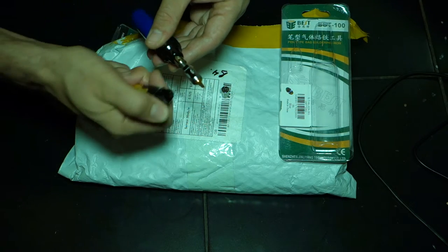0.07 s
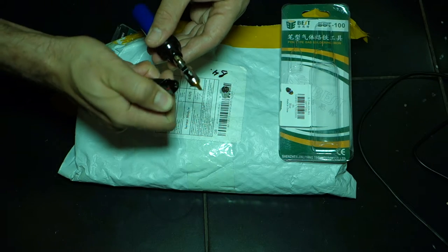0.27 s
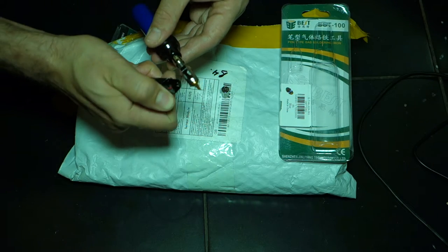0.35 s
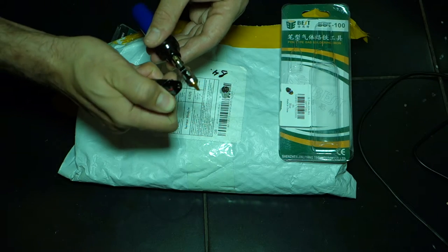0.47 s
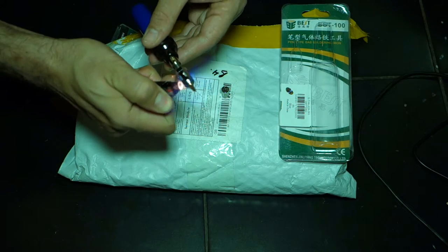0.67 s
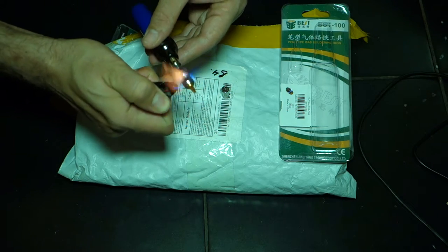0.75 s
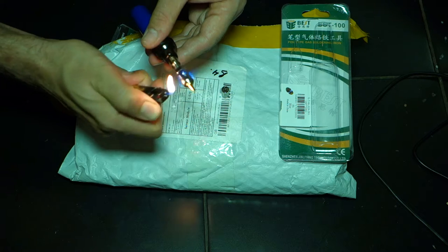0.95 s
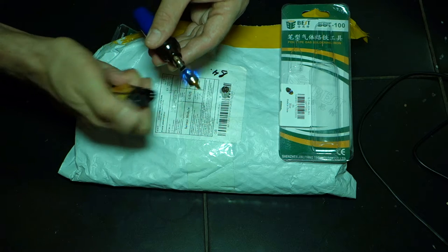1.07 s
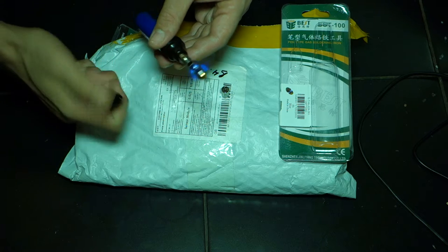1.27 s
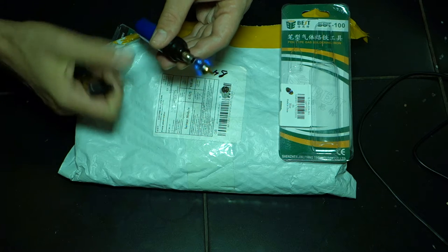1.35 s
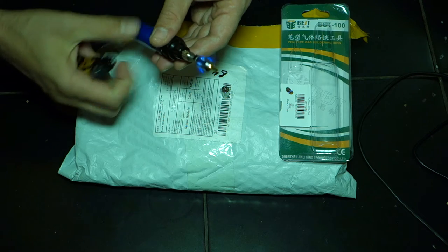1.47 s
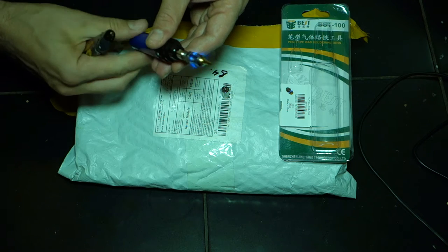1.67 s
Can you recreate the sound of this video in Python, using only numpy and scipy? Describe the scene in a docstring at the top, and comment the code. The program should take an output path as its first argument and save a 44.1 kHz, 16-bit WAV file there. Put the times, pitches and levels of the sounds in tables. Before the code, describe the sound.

A flint lighter clicks sharply several times close by, then rasps, and a softly hissing gas soldering pen catches with a low puff. The lever snaps back and the hiss softens, over a faint fan hum in a small room.

```python
"""First comes the hiss of gas from a soldering pen in a small room, with a fan motor humming behind it.
A flint lighter clicks under the thumb as its small parts hit and ring, and its case knocks once.
Its wheel rasps over the flint and the gas catches with a soft, low puff. The lever snaps back,
and the pen burns on with a quieter hiss and a faint whistle."""
import sys
import numpy as np
from scipy import signal
from scipy.fft import rfft, irfft, next_fast_len
from scipy.io import wavfile
from scipy.ndimage import uniform_filter1d, map_coordinates

SR = 44100
rng = np.random.default_rng(int(sys.argv[2]) if len(sys.argv) > 2 else 0)


def output_pcm(signal):
    """Save a mono or channel-first signal as 16-bit PCM at the path in sys.argv[1].

    Samples are clipped to [-1, 1] before scaling.
    """
    pcm = np.clip(np.atleast_2d(signal).T, -1, 1) * 32767
    wavfile.write(sys.argv[1], SR, np.round(pcm).astype(np.int16))


N = 74970


def amp(db):
    """Turn decibels into a number to multiply by."""
    return 10 ** (np.asarray(db) / 20)


def unit(x):
    """Scale a signal to an average (rms) strength of 1."""
    return x / np.sqrt(np.mean(x ** 2) + 1e-20)


def along(points, hz):
    """Read between (frequency, value) points on a log frequency scale."""
    f, v = np.transpose(points)
    return np.interp(np.log(hz + 1), np.log(f + 1), v)


def wobble(per_s):
    """A smooth curve through per_s random values a second."""
    return map_coordinates(rng.standard_normal(int(N * per_s / SR) + 4), [np.arange(N) * per_s / SR])


def coloured(x, db_at):
    """Turn each frequency up or down by db_at(hz) decibels."""
    n = x.shape[-1]
    m = 2 * next_fast_len(n)
    cepstrum = irfft(np.log(amp(db_at(np.fft.rfftfreq(m, 1 / SR)))), m)
    # make the ringing come after a sound, never before it
    cepstrum[1:m // 2] *= 2
    cepstrum[m // 2 + 1:] = 0
    return irfft(rfft(x, m) * np.exp(rfft(cepstrum)), m)[..., :n]


def stereo(pair, alike, pan_db=0):
    """Mix two unrelated signals into left and right; alike=1 gives both the same wave."""
    turn = np.arccos(np.clip(alike, -1, 1)) / 2
    mid, side = pair[0] * np.cos(turn), pair[1] * np.sin(turn)
    return np.array([(mid + side) * amp(pan_db / 2), (mid - side) * amp(-pan_db / 2)])


def noise(colour):
    """Two unrelated noises whose colour (mix of lows and highs) follows a table."""
    return unit(coloured(rng.standard_normal((2, N)), lambda hz: along(colour, hz)))


# colour of the hiss, unlit and burning: f/Hz, level/dB
UNLIT_HISS = [(500, -41), (1800, -14), (2200, -10.5), (3300, -16), (4700, -15), (6000, -3.5), (7300, -16.5),
              (8300, -6), (9400, 0.5), (10100, 1.5), (11000, -10.5)]
BURNING_HISS = [(500, -13), (1800, -13.5), (2200, -3.5), (3400, -14.5), (4000, -5.5), (4600, -17),
                (5500, -6.5), (6200, -5), (6900, -15), (8300, -14.5), (9400, 3), (10100, -2.5),
                (11000, -15)]

def gas_jet(lit_s=0.76, change_s=0.1, whistle_hz=5960, whistle_width_hz=150):
    """Gas hisses through the nozzle; once lit it softens and a faint whistle grows."""
    t = np.arange(N) / SR - lit_s
    lit = np.clip(t / change_s, 0, 1)
    cold = amp(-48) * np.sqrt(1 - lit) * noise(UNLIT_HISS)
    peak_db = lambda hz: -20 * np.log10(1 + (2 * (hz - whistle_hz) / whistle_width_hz) ** 2)
    whistle = amp(-77 + 18.5 * t) * unit(coloured(rng.standard_normal((2, N)), peak_db))
    flame = amp(-52 - 3.5 * t) * noise(BURNING_HISS)
    hiss = cold + np.sqrt(lit) * (flame + whistle)
    flutter = amp(0.8 * wobble(per_s=14.6))
    return stereo(hiss, alike=0.1, pan_db=-1.5) * flutter


# the motor's tones: cycles per turn of the shaft, level/dB
MOTOR_TONES = [(2, -48), (3, -68), (6, -79.5), (9, -70), (26, -65), (29, -70), (31, -76)]
# colour of the moving air: f/Hz, level/dB
AIR_RUSH = [(20, -16), (60, -4.5), (130, 2), (200, -2.5), (330, -8.5), (450, -10), (700, -13), (900, -18.5),
            (1150, -11.5), (1370, -6), (1650, -20), (3000, -25), (11000, -20.5)]
# how alike the air sounds left and right: f/Hz, likeness from 0 to 1
AIR_LIKENESS = [(30, 0.85), (120, 0.99), (300, 0.7), (600, 0.38), (1400, 0.16), (5000, 0.12)]

def fan(shaft_hz=49.32, air_db=-56.5):
    """The motor hums at multiples of its turning speed, over a soft rush of air."""
    shaft_angle = 2 * np.pi * shaft_hz * np.arange(N) / SR + 0.025 * wobble(per_s=5.06)
    hum = np.zeros(N)
    for cycles, db in MOTOR_TONES:
        strength = np.sqrt(2) * amp(db - 0.5 * wobble(per_s=5.1))
        hum += strength * np.sin(cycles * shaft_angle + 2 * np.pi * rng.random())
    alike = along(AIR_LIKENESS, np.fft.rfftfreq(N, 1 / SR))
    air = irfft(stereo(rfft(noise(AIR_RUSH)), alike), N)
    return hum + amp(air_db) * air


def rattle(t, fade_s, crack_fade_s=0.0014, smooth_hz=500):
    """One hit: a sharp crack and a dying chatter. A fade is the time taken to drop 60 dB."""
    chatter = amp(-60 * t / fade_s)
    crack = amp(-6 - 60 * t / crack_fade_s)
    burst = rng.standard_normal((2, len(t))) * (chatter + crack)
    # even out lows and highs so that every part is shaken alike
    power = np.abs(rfft(burst)) ** 2
    power = np.abs(uniform_filter1d(power, round(smooth_hz * len(t) / SR), axis=1))
    excess_db = 10 * np.log10(power / power.mean(axis=1, keepdims=True) + 1e-9)
    grid = np.fft.rfftfreq(len(t), 1 / SR)
    return np.array([coloured(b, lambda hz: -np.interp(hz, grid, e)) for b, e in zip(burst, excess_db)])


# notes of the lighter's shell: f/Hz, width/Hz, boost/dB
SHELL_NOTES = [(2075, 38, 8), (3330, 23, 9.5), (5040, 36, 7.5), (6030, 64, 4), (10000, 23, 4)]

def shell_db(hz):
    """The shell rings at a few sharp pitches and makes them louder."""
    return sum(db / (1 + (2 * (hz - centre) / width) ** 2) for centre, width, db in SHELL_NOTES)


# bounces off the hands and table: delay/s, level/dB
BOUNCES = [(.0013, -21), (.0031, -10.5), (.0042, -18.5)]

def near_echoes(x):
    """The sound plus its weak copies from nearby surfaces."""
    n = x.shape[-1]
    hz = np.fft.rfftfreq(2 * n, 1 / SR)
    echoes = sum(amp(db) * np.exp(-2j * np.pi * hz * delay_s) for delay_s, db in BOUNCES)
    return irfft(rfft(x, 2 * n) * (1 + echoes))[..., :n]


# how long the room rings: f/Hz, fade/s
ROOM_FADE = [(200, 0.32), (2000, 0.22), (6000, 0.25), (11000, 0.19)]
# colour of the room's echo: f/Hz, level/dB
ROOM_TONE = [(1500, 6.5), (4000, 0.5), (7500, 2.5), (9300, 0.5), (10300, 2.5)]

def room(x, delay_s=0.002, build_s=0.0085):
    """Echoes from the walls blur into a short tail, different on each side."""
    hz, t, spectrum = signal.stft(rng.standard_normal((2, SR // 2)), SR, nperseg=256)
    fade = amp(-60 * t / along(ROOM_FADE, hz)[:, None])
    tail = signal.istft(spectrum * fade, SR, nperseg=256)[1]
    tail *= np.clip((np.arange(tail.shape[1]) / SR - delay_s) / build_s, 0, 1)
    tail /= np.linalg.norm(tail, axis=1, keepdims=True)
    tail = coloured(tail, lambda hz: along(ROOM_TONE, hz))
    return signal.fftconvolve(x, tail, axes=1)[:, :x.shape[1]]


# where the lighter's body, cap, lever, spring, wheel and metal edge ring: f/Hz, width/Hz
PARTS = [(2030, 270), (2980, 220), (3930, 250), (5050, 300), (6250, 430), (10500, 800)]
# colour shared by all clicks: f/Hz, level/dB
CLICK_TONE = [(100, -39), (500, -32.5), (850, -34), (1300, -17.5), (1800, -10), (2700, -4), (4000, -2.5),
              (6000, -6), (7500, -2), (9500, 3), (11000, -1.5)]
# the clicks: t/s, level/dB, fade/s, boost/dB for each of the six parts, left over right/dB, room/dB
LIGHTER_HITS = [(0.1185, -23, 0.015, 3, -6, -7, 2.5, 8, -2, -1.5, -6),
                (0.1346, -31, 0.0088, -12, -15, 6, -2, 0, 14, -5, -7.5),
                (0.1578, -33.5, 0.061, 5.5, -1.5, -3, 3, 8.5, 6.5, -4.5, -8),
                (0.2279, -21, 0.012, -3, -9, 8, 5, 5.5, 16.5, -5, -7.5),
                (0.3652, -16, 0.034, 11, -8, 3, -4, 5.5, 0.5, -3.5, -6.5),
                (0.5734, -21, 0.017, 4.5, -8, 5.5, 3, 10.5, 6.5, -4, -7),
                (0.6538, -13, 0.015, -0.5, -4.5, 1, 6, 6.5, 3.5, -5, -6),
                (0.6926, -25, 0.014, -6, 2, -1, -6, 9, 3.5, -21, -6),
                (0.6932, -14, 0.021, 12.5, -4, 9.5, 10, 9.5, -1.5, -6, 1),
                (0.969, -27, 0.031, 13.5, -0.5, -3, 4.5, 0.5, -5.5, -0.5, -3.5),
                (.9772, -29, 0.023, 5, -2, 5, -4, 6, -5, -2, -6),
                (1.0702, -17.5, 0.015, 14, 4, 7, -3, -5, 4, -3, -3.5),
                (1.0820, -18.5, 0.036, 10, 12, 15.5, -2, 2.5, -6, -3, -6),
                (1.4903, -46, 0.037, -2, 20, 3, 11, 6, -10, -1, -9)]

def lighter_clicks(full_lean_hz=3520):
    """Each hit rattles the lighter and rings its parts, some more than others."""
    out = np.zeros((2, N + SR))
    t = np.arange(SR // 2) / SR
    for start_s, db, fade_s, *boosts_db, pan_db, room_db in LIGHTER_HITS:
        parts_db = lambda hz: sum(boost * np.exp(-.5 * ((hz - centre) / width) ** 2)
                                  for boost, (centre, width) in zip(boosts_db, PARTS))
        ring = coloured(rattle(t, fade_s), lambda hz: along(CLICK_TONE, hz) + parts_db(hz) + shell_db(hz))
        left, right = stereo(near_echoes(ring), alike=0.29)
        # highs lean to one side, lows stay in the middle
        lean_db = lambda hz: pan_db / 2 * np.minimum(hz / full_lean_hz, 1) ** 2
        direct = np.array([coloured(left, lean_db), coloured(right, lambda hz: -lean_db(hz))])
        echo = amp(room_db) * stereo(room(ring), alike=0.25, pan_db=-1)
        start = round(start_s * SR)
        out[:, start:start + len(t)] += amp(db) * (direct + echo)
    return out[:, :N]


def case_knock(start_s=0.366, pitch_hz=558, fade_s=0.02):
    """The plastic case gives one short, dull note."""
    t = np.maximum(np.arange(N) / SR - start_s, 0)
    note = amp(-43.5 - 60 * t / fade_s) * np.sin(2 * np.pi * pitch_hz * t)
    return note + amp(-12) * room(note[None])


# colour of the scraped flint: f/Hz, level/dB
FLINT_TONE = [(100, -25), (500, -25), (850, -55), (1400, -27), (1950, -3), (2750, -8), (3450, 2),
              (4450, -5), (5150, 1.5), (6400, 0), (7500, -4), (8500, 0), (9200, 3), (10200, 2.5),
              (11000, -0.5)]

def flint_rasp(start_s=0.6932, rise_s=0.0074, peak_s=0.034, fade_s=0.16, grains_per_s=9900):
    """The wheel's teeth tear tiny grains off the flint, harder as it speeds up, then it runs out."""
    t = np.arange(N) / SR - start_s
    effort_db = np.minimum(45 * (t - peak_s), -60 * (t - peak_s) / fade_s)
    bite_db = 1.7 * wobble(per_s=260)  # the teeth bite unevenly
    stroke = np.clip(t / rise_s, 0, 1) * amp(effort_db + bite_db)
    breaks_off = rng.random(N) < grains_per_s / SR
    sizes = breaks_off * amp(1.5 * rng.standard_normal(N))
    grains = sizes * rng.standard_normal((2, N))
    ringing = unit(coloured(grains, lambda hz: along(FLINT_TONE, hz) + shell_db(hz)))
    scrape = amp(-20) * stroke * ringing
    return stereo(scrape + amp(-4) * room(scrape), alike=0.016, pan_db=-1)


# colour of the flame flaring up: f/Hz, level/dB
FLARE_TONE = [(30, -37), (80, -4), (150, 0.5), (280, -5.5), (420, -31), (900, -36), (3000, -65)]

def gas_puff(peak_s=0.7195, width_s=0.012, throb_hz=119.4, fade_s=0.21):
    """The gathered gas catches with a low throb and a short, breathy flare."""
    t = np.arange(N) / SR - peak_s
    throb = amp(-34) * np.exp(-.5 * (t / width_s) ** 2) * np.cos(2 * np.pi * throb_hz * t)
    rise = np.clip(1 + t / width_s, 0, 1)
    fall = amp(-42 - 60 * np.maximum(t, 0) / fade_s)
    return throb + rise * fall * stereo(noise(FLARE_TONE), alike=1)


def scene():
    """Gas, fan and lighter together."""
    return gas_jet() + fan() + lighter_clicks() + case_knock() + flint_rasp() + gas_puff()


def record(dry, top_hz=11050):
    """Cut away the very highest sounds, above top_hz."""
    m = next_fast_len(N + SR // 2)
    gain = 1 / np.sqrt(1 + (np.fft.rfftfreq(m, 1 / SR) / top_hz) ** 500)
    return irfft(rfft(dry, m) * gain, m)[:, :N]


dry = scene()
out = record(dry)
output_pcm(out)
```